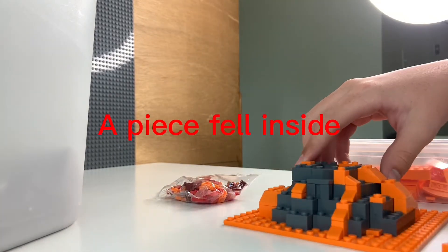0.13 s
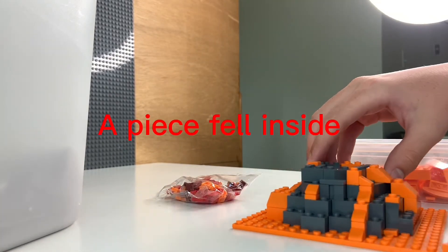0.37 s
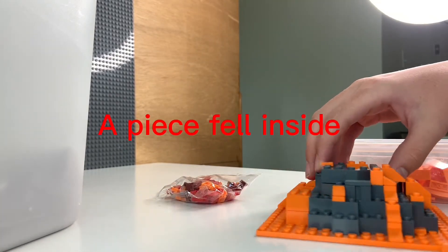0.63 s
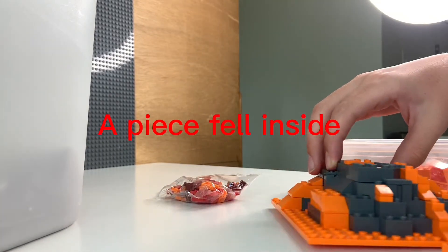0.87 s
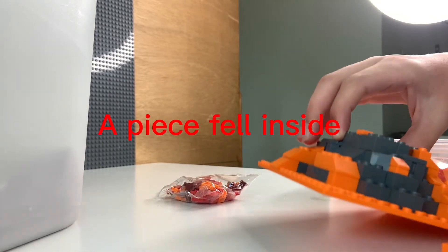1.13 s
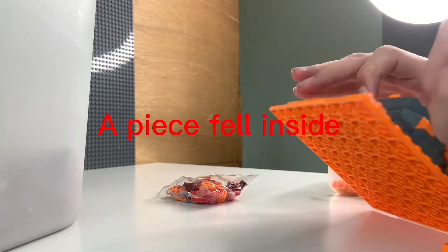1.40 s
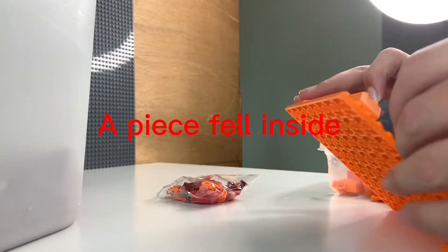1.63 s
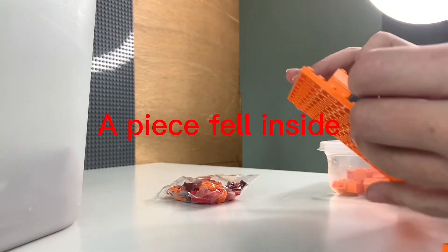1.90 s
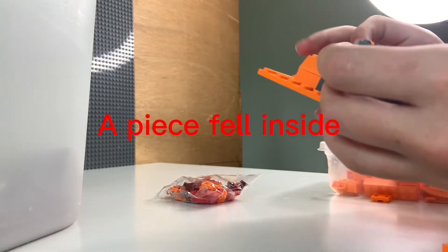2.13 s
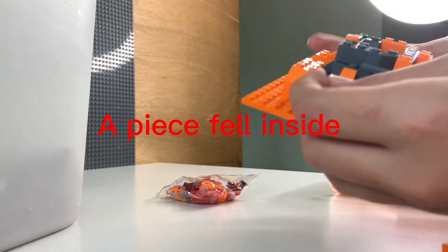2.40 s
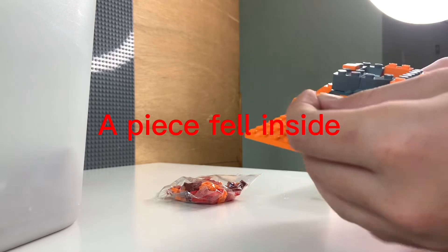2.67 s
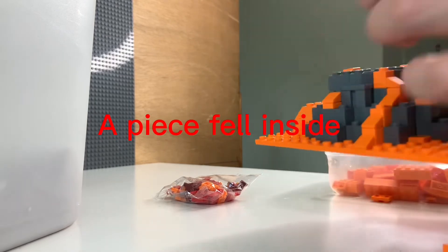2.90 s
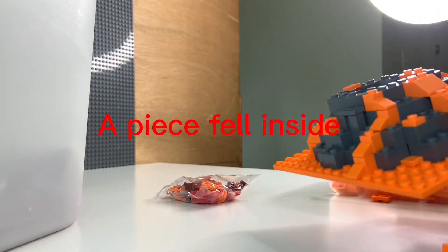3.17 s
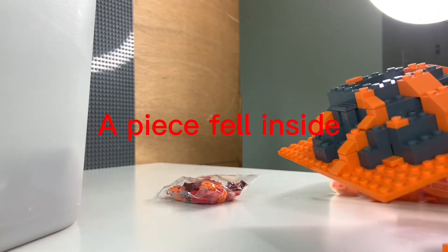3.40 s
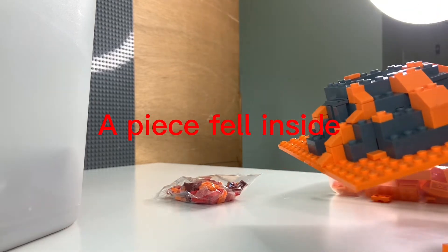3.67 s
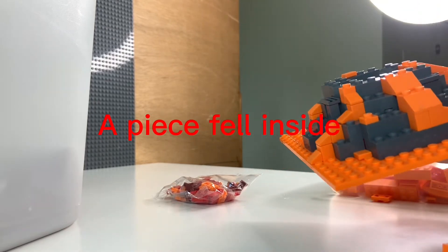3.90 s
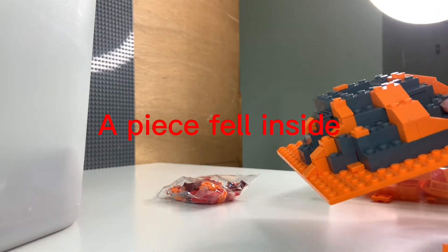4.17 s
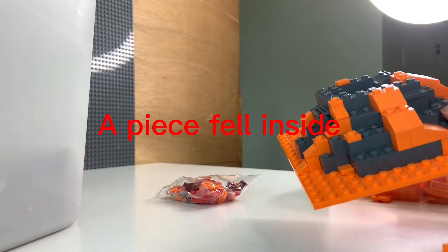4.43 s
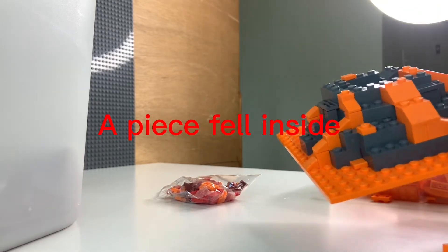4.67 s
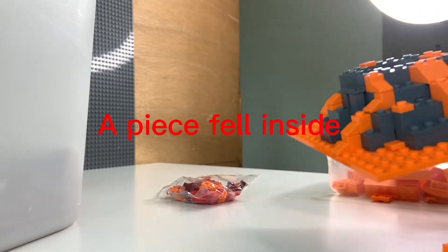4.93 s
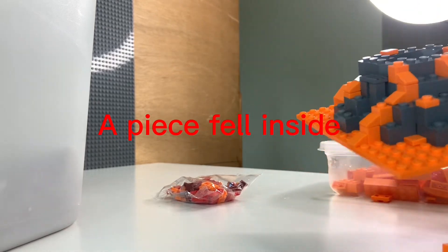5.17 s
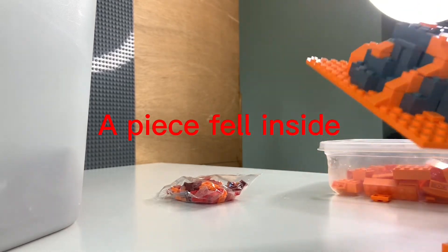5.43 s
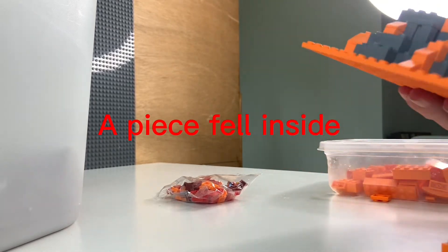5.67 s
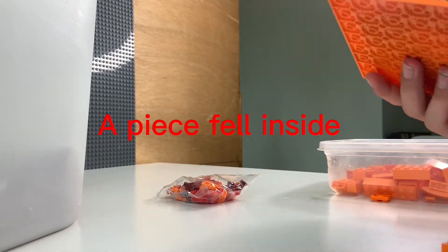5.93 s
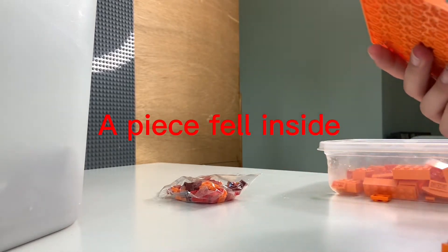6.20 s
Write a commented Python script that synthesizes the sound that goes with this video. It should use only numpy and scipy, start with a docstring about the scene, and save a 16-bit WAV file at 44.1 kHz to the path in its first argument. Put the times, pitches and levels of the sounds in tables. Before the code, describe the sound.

Close plastic rubbing, dull bumps and crisp clicks as a brick-built model is tipped and handled, fading to sparse tiny taps over low room hum.

```python
"""Handled model of plastic bricks

A hollow model on its base plate is slid over a table, lifted, tilted and turned in two hands.
Blows (taps, snaps) and stick-slip grains (rubbing, dragging) ring its modes; a joint creaks in regular slips.
Low pushes bump the plate; skin hisses on plastic; filtered noise gives the room hum and a diffuse echo.
Two close microphone ports hear it."""
import sys
import numpy as np
from scipy import signal
from scipy.fft import rfft, irfft, next_fast_len
from scipy.io import wavfile
from scipy.ndimage import uniform_filter1d

SR = 44100
rng = np.random.default_rng(int(sys.argv[2]) if len(sys.argv) > 2 else 0)


def amplitude_ratio(level_db):
    """Convert a level in decibels to the matching linear amplitude (field) ratio."""
    exponent = np.asarray(level_db, float) / 20
    return 10 ** exponent


def store_pcm(level_fs):
    """Save levels as 16-bit WAV."""
    pcm = np.round(np.clip(level_fs, -1, 1) * 32767).astype(np.int16)
    wavfile.write(sys.argv[1], SR, np.atleast_2d(pcm).T)


N = 278520

# modes of the model: f/Hz, relative level/dB, t60/s
MODES = [(280, -11, 0.15), (367, -13.5, 0.11), (490.6, -2, 0.032), (607, -7.5, 0.036), (710, -8, 0.046),
         (920, -4.5, 0.11), (1070, 6, 0.023), (1200, -7, 0.03), (1300, 2, 0.097), (1400, 3, 0.046),
         (1500, 0.5, 0.03), (1620, -2, 0.027), (1874, 2, 0.024), (2000, -0.5, 0.018), (2129, 9.5, 0.0065),
         (2545, 6, 0.012), (2810, 3, 0.0034), (3100, -8.5, 0.012), (3290, -8, 0.014), (3570, -6, 0.014),
         (3880, 4, 0.0071), (4240, -5, 0.018), (4650, 0, 0.0071), (5260, -4.5, 0.01), (5880, -5.5, 0.0035),
         (6200, -4.5, 0.011), (6450, -8.5, 0.01), (6900, -9, 0.011), (7360, -14, 0.0037),
         (9300, -32, 0.033), (9760, -46, 0.065), (12100, -52.5, 0.0078), (12720, -42, 0.0013),
         (15240, -55, 0.0047)]
# hollow inside: mode range f/Hz; gain under the palms: t/s, level/dB
HOLLOW_HZ = [1250, 1650]
HOLLOW_GAIN = [(0, -4.5), (.5, -1.5), (.6, -7), (.9, -3), (1.05, -4), (1.56, -3.5), (1.6, 2), (1.77, -11),
               (1.8, 6), (1.89, -5.5), (1.93, 0.5), (2.35, 4.5), (2.4, -6), (2.45, 1), (2.66, 0.5),
               (2.7, -9), (2.95, -7.5), (3.1, -4.5), (6.32, 6)]
# contact time scale: t/s, duration/ms
GRIP = [(0, 7), (.5, 3.6), (.7, 3.77), (.76, 7), (.9, 7.9), (1.13, 9.2), (1.3, 8.7), (1.4, 3.9),
        (1.45, 4.6), (1.48, 7.2), (1.55, 6.5), (1.6, 3.86), (1.78, 9.5), (1.9, 7.1), (2.2, 11.3),
        (2.6, 9.1), (2.7, 3.83), (2.73, 4.46), (3.2, 7.1), (5.0, 7.2), (5.4, 6.7), (6.32, 9.8)]

# room tone spectrum: f/Hz, relative density/dB per Hz
HUM = [(25, -7), (50, 6), (137, 2), (190, 6), (500, -5.5), (700, -12), (1000, -13.5), (1330, -36),
       (1900, -40), (4000, -33), (8000, -42), (12000, -40.5), (16000, -60)]
# room tone left-right likeness: f/Hz, correlation
LIKENESS = [(60, 0.94), (180, 1), (550, 0.38), (16000, 0)]
# room drones: f/Hz, width/Hz, level/dB rms
DRONES = [(137.45, 28, -56.5), (113, 23, -64.5)]
HUM_DB = -55.5

# plate dragging on table or palm: t/s of the height, rise/s, fall/s, level/dB, f/Hz
DRAGS = [(0, .02, 0.058, -44.5, 284), (.3, 0.19, 0.12, -48, 422), (.48, 0.16, 0.16, -55.5, 460),
         (.57, 0.15, 0.064, -52, 300), (.67, 0.17, 0.14, -39, 280), (.85, 0.19, 0.026, -45, 280),
         (.93, 0.14, 0.092, -51.5, 540), (1.42, 0.074, 0.033, -59, 395), (1.61, 0.0039, 0.069, -37.5, 480),
         (2.72, 0.013, 0.13, -36, 665), (2.8, 0.072, 0.22, -47, 600), (2.884, .008, 0.016, -45, 480),
         (2.9, .008, 0.032, -43, 480), (2.89, 0.12, 0.07, -49.5, 477.4), (5.27, 0.056, 0.093, -62, 480)]
# fingers and loose bricks rubbing: t/s of the height, rise/s, fall/s, hollow body level/dB, studs level/dB, f/Hz
RUBS = [(0, 0.017, 0.045, -51, -58, 1070), (.23, 0.089, 0.13, -55.5, -57.5, 1600),
        (.29, 0.066, 0.098, -45.5, -49, 2160), (.465, 0.049, 0.05, -43.5, -59, 1200),
        (.54, 0.15, 0.074, -48, -49.5, 1660), (.62, 0.15, 0.12, -48, -54, 1500),
        (.69, 0.12, 0.077, -42, -46.5, 1830), (.83, 0.19, 0.087, -42, -45, 1608),
        (.94, 0.3, 0.29, -56, -63, 1300), (1.1, .015, 0.049, -47, -53, 1400),
        (1.14, 0.051, 0.12, -43, -50.5, 1400), (1.2, 0.057, 0.072, -39, -49.5, 1420),
        (1.35, 0.051, 0.14, -53.5, -64.5, 1390), (1.47, 0.029, 0.047, -34, -39.5, 1340),
        (1.61, 0.03, 0.095, -41.5, -52.5, 1146), (1.83, 0.075, 0.033, -54.5, -52, 1500),
        (1.96, 0.17, 0.19, -58.5, -59.5, 1280), (2.12, 0.065, 0.12, -61, -81, 1420),
        (2.22, 0.17, 0.31, -71, -65, 1360), (2.41, 0.078, 0.06, -60, -70, 2000),
        (2.49, 0.2, 0.089, -63, -67, 1400), (2.64, 0.079, 0.094, -57, -67, 1400),
        (2.74, 0.048, 0.13, -46, -45, 1070), (2.81, 0.058, 0.041, -42.5, -43.5, 1070),
        (2.87, 0.09, 0.07, -45, -52, 1070), (2.92, 0.033, 0.14, -57, -69.5, 1034),
        (3.185, 0.014, 0.054, -66, -65.5, 1400), (3.37, 0.012, 0.077, -69, -67.5, 1400),
        (3.52, 0.085, 0.1, -68, -87.5, 1353), (3.69, 0.0083, 0.043, -71.5, -73, 1400),
        (3.835, .008, 0.044, -68, -68, 1400), (3.97, 0.022, .07, -74.5, -71, 1400),
        (4.09, 0.073, 0.09, -61, -73, 1454), (4.43, 0.11, 0.11, -78.5, -72.5, 1380),
        (4.57, 0.029, 0.1, -57, -74, 1500), (4.62, 0.057, 0.063, -59.5, -86, 964),
        (4.77, 0.033, 0.039, -71.5, -69, 1413), (5.11, 0.037, 0.04, -50, -67.5, 923),
        (5.18, 0.058, 0.056, -59.5, -81.5, 930), (5.3, 0.017, 0.051, -54, -76, 1270),
        (5.4, 0.067, 0.088, -59.5, -71, 1430), (5.6, 0.038, 0.038, -64, -91.5, 1300),
        (5.83, 0.098, 0.043, -65.5, -77.5, 1800), (6.085, 0.035, 0.043, -69.5, -66, 1400),
        (6.15, 0.057, 0.054, -74, -71.5, 1400), (6.24, 0.019, 0.06, -58, -60, 1400),
        (6.29, 0.061, 0.14, -49, -54.5, 1300)]
# skin brushing plastic: t/s of the height, rise/s, fall/s, level/dB
BRUSHES = [(0, .02, 0.047, -67), (.67, 0.18, 0.15, -59.5), (.82, 0.052, 0.048, -51),
           (1.18, 0.22, 0.14, -72), (1.92, 0.064, 0.19, -62.5), (2.19, 0.12, 0.12, -65),
           (2.29, 0.019, 0.04, -60), (2.02, 0.022, 0.028, -55.5), (2.39, 0.07, 0.13, -56.5),
           (2.47, 0.058, 0.026, -59), (2.62, 0.08, 0.054, -70.5), (2.77, 0.041, 0.044, -37),
           (2.86, 0.052, 0.035, -66), (3.52, 0.16, 0.055, -76), (4.09, 0.037, 0.11, -71.5),
           (4.56, 0.025, 0.17, -71.5), (5.36, 0.042, .1, -79), (6.29, 0.083, .1, -66)]
# band edges of plate, body, studs and skin: f/Hz
RUB_EDGES_HZ = [200, 850, 2300, 8000, 18000]
# left-right lean of plate, body, studs and skin: level/dB
RUB_PAN_DB = [5, 2.5, -1, -2]
# grain unevenness on plate, body, studs and skin: level/dB per exponential unit
GRAIN_DB = [2, 3.4, 2.6, 4.5]
# how far the pitches of the rubbed body stand out: t/s, level/dB
FOCUS = [(0, 10.5), (.47, 2.5), (.56, 2.5), (.85, -7.5), (1.0, 3), (1.1, 23), (1.22, 20), (1.3, 4.5),
         (1.5, 20), (1.65, 12), (2.0, 4.5), (2.6, 7.5), (2.8, 3), (3.4, 9.5), (4.5, 9.5), (5.2, 42.5),
         (5.5, 21), (5.8, 3), (6.05, 6), (6.09, 10), (6.19, 10), (6.23, 12), (6.32, 7.5)]
# where the rubbed studs ring: t/s, f/Hz
STUDS_PITCH = [(0, 2900), (.3, 2450), (.55, 3200), (.7, 2600), (.78, 6000), (.9, 5640), (1.05, 3320),
               (1.3, 3300), (1.45, 2670), (1.85, 2870), (1.9, 2580), (2.25, 2600), (2.35, 3400),
               (2.62, 4600), (2.7, 2900), (2.81, 2850), (2.84, 6900), (2.92, 6900), (2.96, 2770),
               (3.3, 3300), (4.7, 3310), (4.76, 4730), (4.85, 3270), (6.05, 3310), (6.08, 6300),
               (6.19, 6300), (6.23, 2920), (6.32, 2920)]
FOCUS_OCTAVES, STUDS_FOCUS_SHARE, DRAG_FOCUS_DB = .14, 1.3, 11
TICK_SHARE = .45   # relative to the grains
STROKE_DEPTH_DB, STROKE_CURVE = 21, 1.265   # drop one rise before or one fall after the height

# taps and ticks: t/s, level/dB before TAP_TRIM_DB, favoured f/Hz, treble share/dB
TAPS = [(.2978, -37.5, 2166, -40), (.3156, -40, 1060, -3), (.4455, -36, 1200, -25), (.5248, -40, 5260, -4),
        (.5315, -43, 6200, 0), (.5454, -43.5, 6200, 0), (.6024, -49, 3880, -10), (.6204, -48, 2000, -8),
        (.6545, -32, 3450, -5), (.6871, -27, 2270, -11), (.6978, -32, 738, -27), (.7318, -33, 2050, -14),
        (.7654, -33, 5260, 3), (.7705, -36, 6550, 8), (.7756, -27, 6730, 7), (.8265, -29, 5000, 0),
        (.8324, -26.5, 6200, -5), (1.0489, -44, 1500, -53), (1.077, -42, 1480, -46), (1.093, -62, 3290, -4),
        (1.113, -47, 1400, -5), (1.1272, -33.5, 1442, -12), (1.144, -39, 1400, -9), (1.152, -46, 1400, -3),
        (1.165, -43, 1390, 0), (1.176, -43, 3290, -1), (1.19, -51, 3290, -16), (1.197, -47, 1400, -12),
        (1.21, -42, 1400, -15), (1.2205, -40, 1400, -15), (1.2495, -41, 1944, -13),
        (1.3217, -47, 1300, -13), (1.3335, -40.5, 1560, -18), (1.3853, -42.5, 1460, -49),
        (1.4123, -37.5, 1522, -32), (1.4365, -35.5, 1910, -24), (1.4504, -36.5, 1420, -2),
        (1.4625, -47, 1300, -25), (1.4705, -45, 2810, -10), (1.479, -29, 1354, -6), (1.483, -31, 1900, -26),
        (1.488, -50, 1400, -16), (1.523, -51, 1470, -20), (1.5579, -41, 1500, -34),
        (1.5955, -23.5, 1200, -18.5), (1.605, -34, 1890, -22), (1.614, -30, 1014, -16),
        (1.6332, -26.5, 1070, -71), (1.7789, -33.5, 1947, -27), (1.812, -40.5, 1500, -9),
        (1.838, -45, 2000, -21), (1.8908, -32, 1945, -51), (1.9504, -41.5, 1500, -36),
        (2.0109, -41.5, 1495, -28), (2.083, -50, 1400, -37), (2.2064, -47.5, 1370, -24),
        (2.2179, -38, 1550, -15), (2.2812, -47, 2140, -14), (2.425, -48.5, 2000, -23),
        (2.4621, -52.5, 1300, -3), (2.5046, -48, 1426, -36), (2.642, -50.5, 2000, -26.5),
        (2.7091, -11, 2637, -7.5), (2.7125, -20, 1070, -16), (2.7165, -26, 743, -17),
        (2.727, -33.5, 3290, -7.5), (2.738, -32.5, 2900, -9.5), (2.752, -36, 4280, -7),
        (2.764, -33.5, 2810, -6), (2.776, -30, 1070, -4), (2.7935, -34, 2840, 0), (2.804, -38, 2830, -11),
        (2.819, -47, 4650, -11), (2.8315, -38, 6900, -11), (2.842, -32, 1070, -16), (2.855, -41, 4280, -8),
        (2.862, -43, 6900, -1), (2.915, -49, 1070, -27), (3.1678, -40, 1432, -9),
        (3.1797, -43.5, 1414, -15.5), (3.3812, -54, 1423, -15), (3.5432, -56, 1016, -5),
        (3.6832, -53, 1490, -14.5), (3.8294, -54.5, 1410, -14), (3.9617, -53.5, 1230, -4),
        (4.0706, -49.5, 1400, -16), (4.279, -66.5, 3290, -13), (4.3687, -51.5, 1400, -16.5),
        (4.3966, -53.5, 1400, -33), (4.4398, -50, 1400, -10.5), (4.5429, -47, 1515, -7.5),
        (4.6009, -63, 983, -39), (4.8, -59, 1344, -8.5), (5.026, -45.5, 1320, -19.5),
        (5.0804, -34, 1428, -1), (5.0863, -36, 920, -27.5), (5.166, -68.5, 2200, -27),
        (5.267, -51, 1396, -10.5), (5.2904, -51, 1360, -31), (5.305, -50.5, 1470, -29),
        (5.3237, -54.5, 1300, -18), (5.3598, -45, 1410, -30), (5.3682, -46, 1500, -9),
        (5.402, -42.5, 1300, -15), (5.4167, -57, 1480, -2), (5.431, -44.5, 1400, -2),
        (5.579, -61.5, 1400, -27), (5.836, -57, 1400, -16), (5.863, -58.5, 1500, -17),
        (5.9638, -73, 6180, 3), (6.067, -49.5, 1510, -24.5), (6.2513, -47.5, 1300, -13),
        (6.2678, -46, 1317, -37)]
# hard edges snapping, mostly top treble: t/s, level/dB before TAP_TRIM_DB
SNAPS = [(.5248, -67), (0.5458, -39), (.7654, -48), (0.775, -23), (0.8321, -40), (1.1286, -51),
         (1.891, -55), (3.1678, -52.5), (5.0808, -65), (5.3598, -50.5)]
TAP_TRIM_DB = -4
SNAP_HZ, SNAP_TREBLE_DB, SNAP_TOP_DB = 12900, -11, 33   # pitch, treble share, extra top treble
TOP_TREBLE_DB, TOP_FOLLOWS = 32.5, .14   # top treble at 0 dB treble share; dB per dB of share
BASS_DB, BASS_FOLLOWS = -10, .45   # low modes in a -31 dB blow; dB per dB of blow

# plate bumping table or palm: t/s, peak level/dB before BUMP_TRIM_DB, f/Hz
BUMPS = [(0.304, -17, 216), (0.639, -95, 277), (0.689, -38, 280), (1.612, -18, 66), (1.624, -15.5, 387),
         (1.641, -19, 113), (1.6334, -25, 600), (1.649, -22, 200), (5.087, -31, 63)]
BUMP_TRIM_DB, BUMP_PAN_DB = -10, 3   # lean to the left

# joint creaking: t/s of the height, rise/s, fall/s, level/dB
CREAK = (.468, .034, .022, -37)
# creak spectrum: multiple of the slip rate, relative level/dB
CREAK_COLOUR = [(3, -2.5), (4, -17), (5, -5.5), (6, -5), (10.2, -15.5), (15.2, -22)]
CREAK_HZ = 420   # mean slip rate

# where the model is held: t/s, left-right level/dB
PAN = [(0, -1), (1.9, 1), (2.102, 0), (3.001, -0.5), (6.32, 0.1)]
# echo decay: f/Hz, t60/s
WALLS = [(300, 0.13), (1000, 0.4), (3000, 0.21), (7000, 0.3), (13000, 0.089)]
WALLS_DB = -7.5
# phase by which the left port leads: f/Hz, phase/rad
LEAD = [(200, 0.31), (600, -1.92), (1300, -1.01), (2500, -1.68), (4000, 2), (5900, 0.44)]
# range over which the ports grow alike: f/Hz
MERGE_HZ = [6300, 8300]
# range over which the lead falls by two turns: f/Hz
LAG_HZ = [6000, 15800]


def rms_one(x):
    """Scale to rms 1."""
    return x / np.sqrt(np.mean(x ** 2) + 1e-20)


def at_hz(points, hz):
    """Read a table on a log-frequency axis."""
    return np.interp(np.log(hz), np.log(np.array(points)[:, 0]), np.array(points)[:, 1])


def at_s(points, t_s):
    """Read a table on a linear axis."""
    return np.interp(t_s, *np.transpose(points))


def band(x, low_hz, high_hz):
    """Butterworth band-pass."""
    sos = signal.butter(2, [low_hz, min(high_hz, .47 * SR)], "band", fs=SR, output="sos")
    return signal.sosfilt(sos, x)


def ring(x, hz, t60_s):
    """Two-pole resonator: a unit click starts a decaying sine of height 1."""
    r = amplitude_ratio(-60 / (max(t60_s, .002) * SR))
    w = 2 * np.pi * hz / SR
    return signal.lfilter([0, np.sin(w)], [1, -2 * r * np.cos(w), r * r], x)


def add(out, t_s, sound):
    """Place a sound at a time."""
    i = round(t_s * SR)
    out[i:i + len(sound)] += sound[:N - i]


def slow_noise(corner_hz=60):
    """Noise through two equal real poles, rms 1."""
    r = np.exp(-2 * np.pi * corner_hz / SR)
    return rms_one(signal.lfilter([1], [1, -2 * r, r * r], rng.standard_normal(N)))


def strokes(rows, column, weight=None):
    """Summed power of strokes that swell to their height and fall away, each times a weight."""
    power = np.full(N, 1e-14)
    for row in rows:
        s, rise_s, fall_s = row[0], max(row[1], .004), max(row[2], .004)
        start = max(round((s - 2 * rise_s) * SR), 0)
        stop = min(round((s + 2 * fall_s) * SR), N)
        i = np.arange(start, stop)
        x = np.abs(i / SR - s) / np.where(i < s * SR, rise_s, fall_s)
        level_db = row[column] - STROKE_DEPTH_DB * x ** STROKE_CURVE
        power[i] += amplitude_ratio(2 * level_db) * (row[weight] if weight else 1)
    return power


def room_tone():
    """Half-octave bands of air noise, alike in the bass only, and two narrow room drones."""
    hum, edges_hz = 0, 25 * 2 ** np.arange(0, 9.6, .5)
    white = rng.standard_normal((3, 2, N))
    for k, (low, high) in enumerate(zip(edges_hz, edges_hz[1:])):
        mid, side = band(white[k % 2], low, high)
        centre_hz = np.sqrt(low * high)
        alike = np.clip(at_hz(LIKENESS, centre_hz), -1, 1)
        pair = np.sqrt(1 + alike) * mid + np.sqrt(1 - alike) * side * [[1], [-1]]
        hum = hum + amplitude_ratio(at_hz(HUM, centre_hz)) * pair
    drones = 0
    for (hz, width_hz, db), noise in zip(DRONES, white[2]):
        drones = drones + amplitude_ratio(db) * rms_one(band(noise, hz - width_hz / 2, hz + width_hz / 2))
    return amplitude_ratio(HUM_DB) * rms_one(hum) + drones


def impulses(per_s, size_db, limit):
    """Random slips: Poisson-like clicks of either sign, heights exponential in dB up to a limit."""
    height = amplitude_ratio(size_db * np.minimum(rng.exponential(1, N), limit))
    return (rng.random(N) < per_s / SR) * height * rng.choice([-1, 1], N)


def rub(grains_per_s=1500, ticks_per_s=130, tick_db=4.5, smooth_db=-19, wide=.65, clump_db=2.5):
    """Dense stick-slip grains excite the modes, most near the rubbed spot's pitch; some friction noise passes."""
    t = np.arange(N) / SR
    drag, body, studs = strokes(DRAGS, 3), strokes(RUBS, 3), strokes(RUBS, 4)
    levels = [drag, body, studs, strokes(BRUSHES, 3)]
    # power-weighted: the strongest stroke sets the pitch
    plate_hz = np.maximum(strokes(DRAGS, 3, weight=-1) / drag, RUB_EDGES_HZ[0])
    body_hz = np.maximum(strokes(RUBS, 3, weight=-1) / body, RUB_EDGES_HZ[1])
    studs_hz = at_s(STUDS_PITCH, t)
    focus_db, hollow_db = at_s(FOCUS, t), at_s(HOLLOW_GAIN, t)
    clumps = rms_one(amplitude_ratio(clump_db * slow_noise()))   # slips come in bunches
    ticks = rms_one(impulses(ticks_per_s, tick_db, 3))   # a catching stud strikes body and treble modes at once
    out = 0
    for low, high, level, pan_db, size_db in zip(RUB_EDGES_HZ, RUB_EDGES_HZ[1:], levels, RUB_PAN_DB, GRAIN_DB):
        grains = impulses(grains_per_s, size_db, 5)
        # a long contact reaches each port its own way
        grains = rms_one(grains + wide * np.roll(grains, N // 3) * [[1], [-1]])
        sound = amplitude_ratio(smooth_db) * rms_one(band(rng.standard_normal((2, N)), low, high))
        power = amplitude_ratio(2 * smooth_db)
        for hz, mode_db, t60_s in MODES:
            if not low <= hz < high:
                continue
            if hz < RUB_EDGES_HZ[1]:
                spot_hz, stand_db = plate_hz, DRAG_FOCUS_DB
            elif hz < RUB_EDGES_HZ[2]:
                spot_hz, stand_db = body_hz, focus_db
            else:
                spot_hz, stand_db = studs_hz, STUDS_FOCUS_SHARE * focus_db
            near = np.exp(-.5 * (np.log2(hz / spot_hz) / FOCUS_OCTAVES) ** 2)
            inside_db = hollow_db * (HOLLOW_HZ[0] < hz < HOLLOW_HZ[1])
            gain = amplitude_ratio(mode_db + 4.4 * (hz > 2400) + stand_db * near + inside_db)
            # the roll gives each mode its own grain timing
            drive = np.roll(grains, round(hz), axis=1) + TICK_SHARE * ticks * (low > RUB_EDGES_HZ[0])
            sound = sound + gain * rms_one(ring(drive + 1e-18, hz, t60_s))
            power = power + gain ** 2
        sides = amplitude_ratio(pan_db / 2 * np.array([[1], [-1]]))
        out = out + np.roll(clumps, round(low)) * sound * np.sqrt(level / power) * sides
    return out


def taps(focus_db=18, focus_octaves=.079, spread_db=5.0, treble_spread_db=1.7, main=.16, quicker=.87, cut_hz=480):
    """A short rough contact strikes all modes; the spot favours one pitch, a hard edge the treble."""
    out, t = np.zeros(N), np.arange(3072) / SR
    hz, mode_db, t60_s = np.transpose(MODES)
    dying = amplitude_ratio(mode_db[:, None] - 60 * t / t60_s[:, None])
    small = signal.butter(3, cut_hz, "high", fs=SR, output="sos")   # small bricks move no bass
    hits = TAPS + [(s, db, SNAP_HZ, SNAP_TREBLE_DB) for s, db in SNAPS]
    chance = rng.normal(0, 1, (len(hits), len(MODES)))
    rough = rng.normal(0, 1, (len(hits), len(t)))
    bright = hz > 2900
    hollow = (hz > HOLLOW_HZ[0]) * (hz < HOLLOW_HZ[1])
    for (s, db, spot_hz, treble_db), luck, grit in zip(hits, chance, rough):
        # the grip bends all modes until the nearest meets the spot's pitch
        bend = spot_hz / hz[np.abs(hz - spot_hz).argmin()]
        rings = dying * np.sin(2 * np.pi * bend * hz[:, None] * t)
        near = np.exp(-.5 * (np.log2(bend * hz / spot_hz) / focus_octaves) ** 2)
        bass_db = BASS_DB + BASS_FOLLOWS * (db + 31)   # harder blows move more
        top_db = TOP_TREBLE_DB + TOP_FOLLOWS * treble_db + SNAP_TOP_DB * (spot_hz == SNAP_HZ)
        edge_db = np.select([hz < 950, hz < 2900, hz < 8000], [bass_db, 0, treble_db + 18], top_db)
        luck_db = np.where(bright, treble_spread_db, spread_db) * luck
        strength = amplitude_ratio(focus_db * near + edge_db + luck_db + at_s(HOLLOW_GAIN, s) * hollow)
        body = signal.sosfilt(small, (strength * ~bright) @ rings)
        edge = (strength * bright) @ rings
        edge[:2] += amplitude_ratio(treble_db - 3) * np.array([4, -4])   # bare crack of the edge
        contact_s = at_s(GRIP, s) / 1000
        x = t / contact_s
        contact = grit * x ** 2.39 * np.exp(-4.5 * x) * 4
        contact[np.argmax(x > .45)] += main   # one asperity takes the main blow
        sharp = contact * np.exp(-(quicker * (x - .45)) ** 2)   # only the height is hard enough for treble
        sound = (signal.fftconvolve(contact, body) + signal.fftconvolve(sharp, edge))[:len(t)]
        loudest = np.sqrt(uniform_filter1d(sound ** 2, size=96).max())   # short-time rms
        add(out, s - .3 * contact_s, amplitude_ratio(db + TAP_TRIM_DB) * sound / loudest)
    return out


def bumps(t60_cycles=.93):
    """Dull low pushes on a resonance that dies within about a cycle."""
    out, push = np.zeros(N), np.hanning(102)
    for s, db, hz in BUMPS:
        sound = ring(np.pad(push, (0, 4000)), hz, t60_cycles / hz)
        add(out, s, amplitude_ratio(db + BUMP_TRIM_DB) * sound / np.abs(sound).max())
    return out


def creak(waver=.016):
    """Nearly regular slips of a joint: a few multiples of their rate sound."""
    phase = 2 * np.pi * np.cumsum(CREAK_HZ * (1 + waver * slow_noise())) / SR
    tone = sum(amplitude_ratio(db) * np.sin(k * phase + 2 * np.pi * rng.random()) for k, db in CREAK_COLOUR)
    return rms_one(tone) * np.sqrt(strokes([CREAK], 3))


def walls(x, onset_s=.001):
    """Diffuse echo: noise of its own on each side, dying band by band."""
    t, tail = np.arange(SR) / SR, 0
    for hz, t60_s in WALLS:
        tail = tail + band(rng.standard_normal((2, SR)), hz / 2, hz * 2) * amplitude_ratio(-60 * t / t60_s)
    tail = tail * (1 - np.exp(-t / onset_s))
    tail = tail / np.sqrt(np.sum(tail ** 2) / 2)
    return amplitude_ratio(WALLS_DB) * signal.fftconvolve(x, tail, axes=1)[:, :N]


def ports(x):
    """The two ports nearly share their treble, which reaches the left a fifth of a millisecond late."""
    size = next_fast_len(N + 4096)
    hz = np.arange(size // 2 + 1) * SR / size
    left, right = rfft(x, size)
    apart = np.interp(hz, MERGE_HZ, [1, .1])
    fill = np.sqrt(2 / (1 + apart ** 2))   # keeps the power of diffuse sound
    pair = fill * ((left + right) / 2 + apart * (left - right) / 2 * [[1], [-1]])
    lead_rad = at_s(LEAD, hz) + np.interp(hz, LAG_HZ, [0, -4 * np.pi])
    return irfft(pair * np.exp(.5j * lead_rad * [[1], [-1]]), size)[:, :N]


def gain_control(x, ceiling_db=-38, share=.15, excess_fall_db_s=60, smooth_s=.00094):
    """Gain drops by a share of the excess level within about a ms, then climbs back at a steady rate."""
    power = uniform_filter1d(np.mean(x ** 2, axis=0), size=220)
    level_db = 10 * np.log10(power.clip(1e-12))
    climb = excess_fall_db_s * np.arange(N) / SR
    held_db = np.maximum.accumulate(np.maximum(level_db - ceiling_db, 0) + climb) - climb
    r = np.exp(-1 / (smooth_s * SR))
    return x * amplitude_ratio(-share * signal.lfilter([1 - r], [1, -r], held_db))


def scene():
    """The handled model, its echo and the room tone."""
    sides = np.array([[1], [-1]])
    pan_db = at_s(PAN, np.arange(N) / SR)
    model = (taps() + rub() + creak()) * amplitude_ratio(pan_db / 2 * sides)
    model = model + bumps() * amplitude_ratio(BUMP_PAN_DB / 2 * sides)
    return model + walls(model) + room_tone()


def roll_off(x):
    """The treble ends steeply here."""
    return signal.sosfilt(signal.butter(12, 16590, fs=SR, output="sos"), x)


def record(dry):
    """Ports, bass and top cut, gain control."""
    heard = signal.sosfilt(signal.butter(3, [55, 15800], "band", fs=SR, output="sos"), ports(dry))
    heard = signal.sosfilt(signal.cheby2(10, 45, 16600, fs=SR, output="sos"), heard)
    mix = gain_control(heard)
    return roll_off(mix)


dry = scene()
out = record(dry)
store_pcm(out)
```